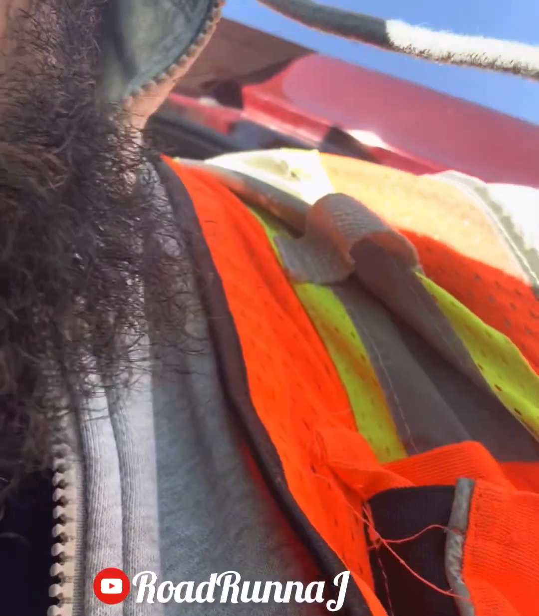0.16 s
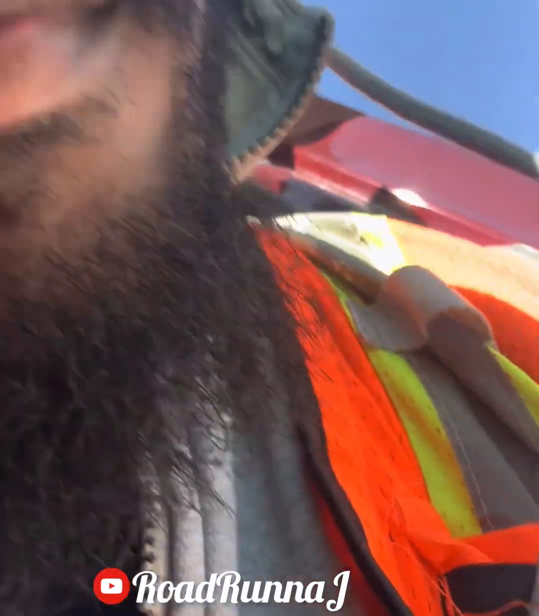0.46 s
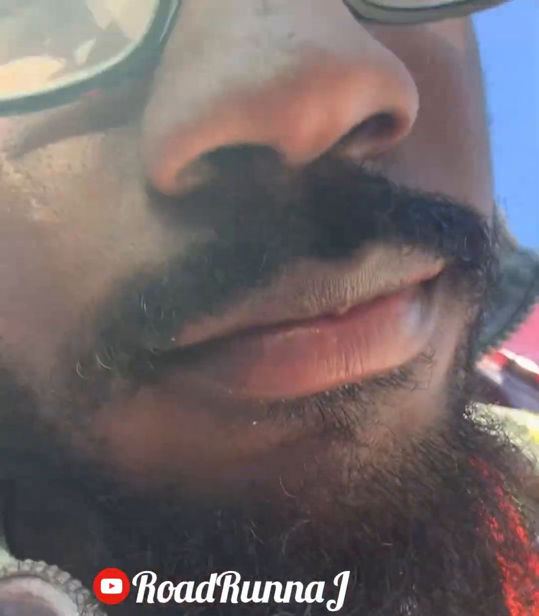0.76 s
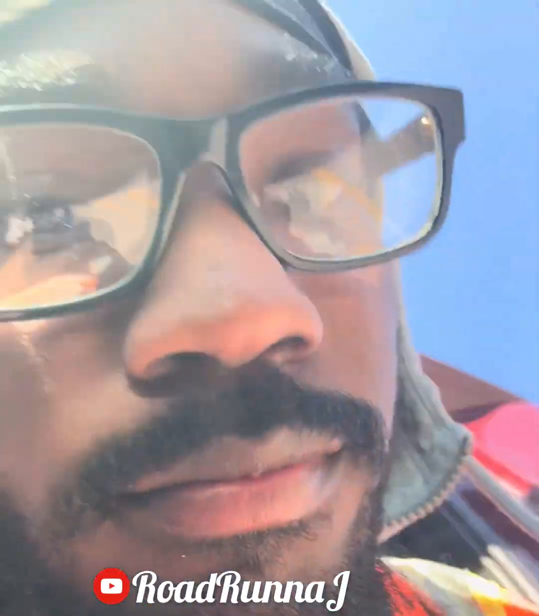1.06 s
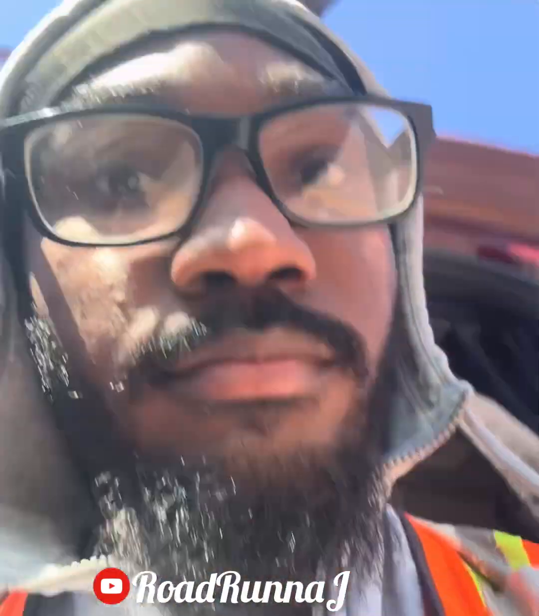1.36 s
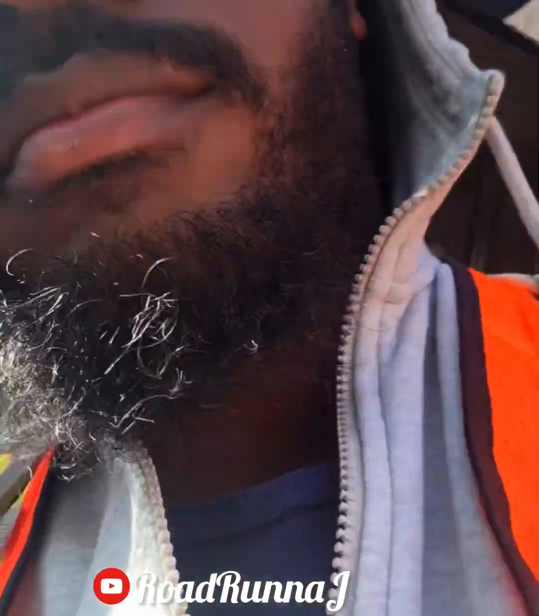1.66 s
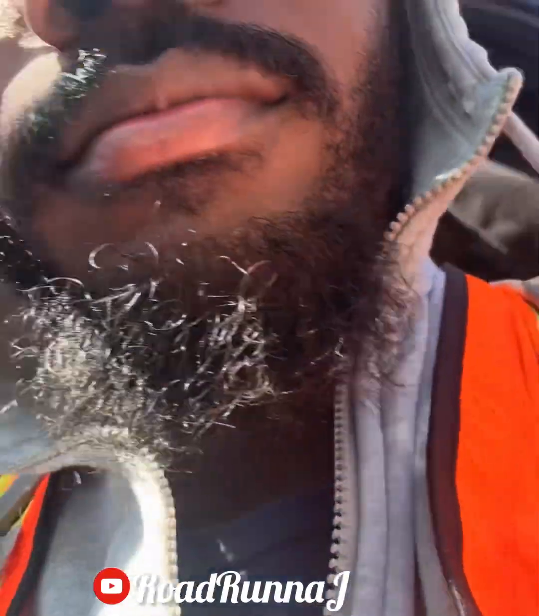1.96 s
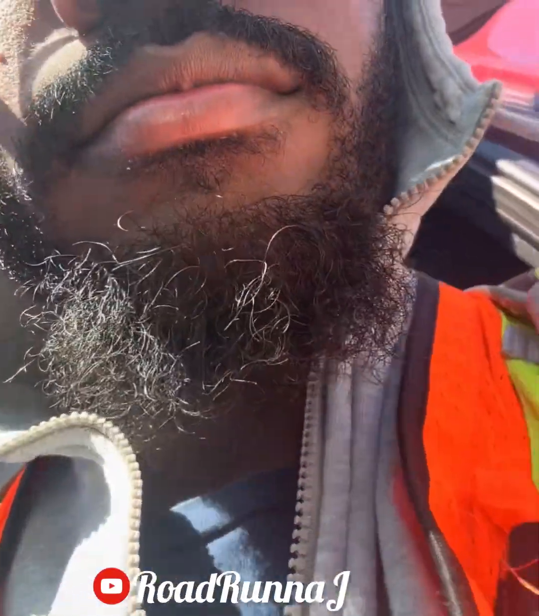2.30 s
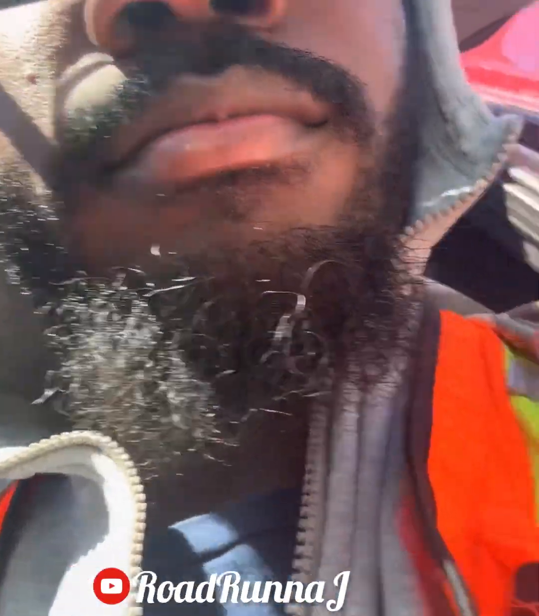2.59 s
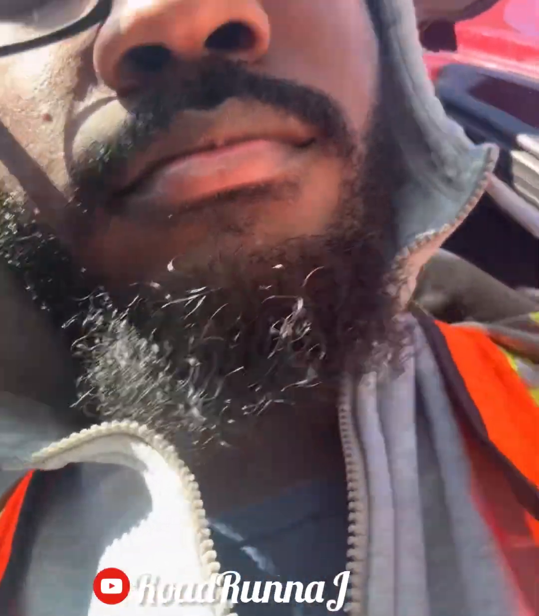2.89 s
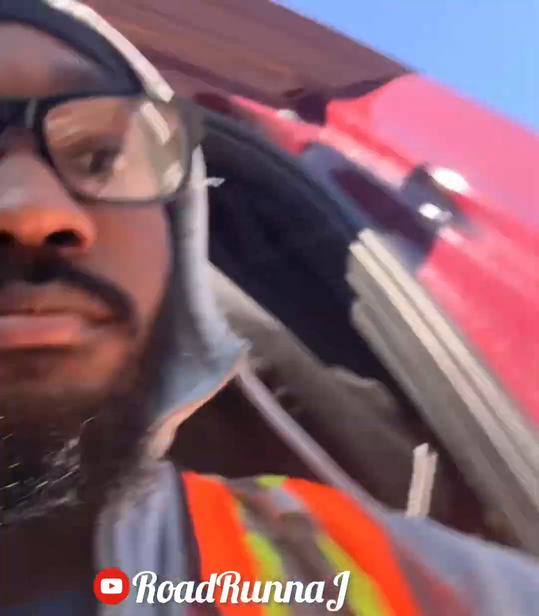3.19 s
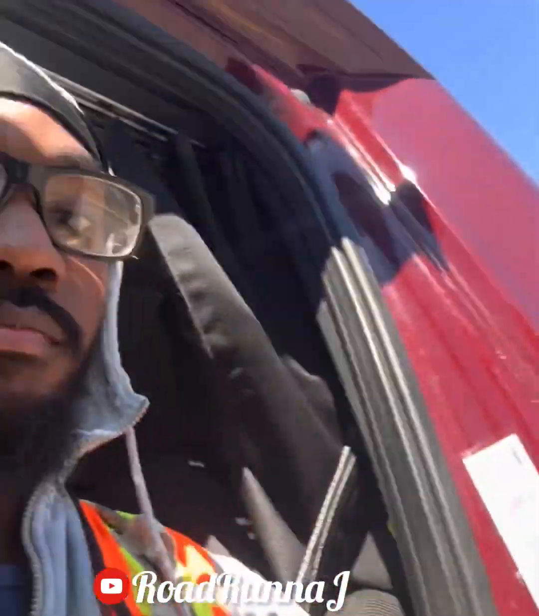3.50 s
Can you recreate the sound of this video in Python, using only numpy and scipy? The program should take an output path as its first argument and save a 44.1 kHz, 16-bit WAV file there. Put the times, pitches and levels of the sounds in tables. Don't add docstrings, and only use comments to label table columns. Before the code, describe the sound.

Steady heavy diesel idle, deep exhaust rumble and fast uneven mechanical clatter, heard beside an open truck cab outdoors. Small bumps and ticks punctuate it, as a moving handheld microphone gently changes the brightness.

```python
import sys
import numpy as np
from scipy import signal
from scipy.fft import rfft, irfft
from scipy.io import wavfile
from scipy.ndimage import uniform_filter1d

SR = 44100
rng = np.random.default_rng(int(sys.argv[2]) if len(sys.argv) > 2 else 0)


def decibels_to_gain(level_db):
    exponent = np.asarray(level_db, float) / 20
    return 10 ** exponent


def dump(signal):
    limited = np.clip(np.atleast_2d(signal).T, -1, 1)
    pcm = np.round(limited * 32767).astype(np.int16)
    wavfile.write(sys.argv[1], SR, pcm)


N = 160965

# time in seconds, four-stroke cycles per second.
CYCLE_HZ = [(0, 5.0), (2.2, 5.0), (3.0, 5.003), (3.65, 5.022)]
# time in seconds, treble shade in dB, exhaust nearness in dB.
POSE = [(0, 0, -1.5), (.3, 1.5, -2), (.62, 1.5, 0.5), (.85, 1, 0), (1.15, 1, 0), (1.3, 0.5, -1),
        (1.5, 0.5, -1.5), (1.8, -1, -1), (2.1, 0, -1), (2.35, 0.5, 0), (2.55, -0.5, -1.5), (2.8, 0, -0.5),
        (2.94, 0, -1), (3.02, 1.5, -2), (3.09, -1.5, 0), (3.2, -1, -1.5), (3.45, 0.5, -1), (3.65, 0.5, -3)]


def evened(x):
    return x / np.sqrt(np.mean(abs(x) ** 2) + 1e-20)


def read(points, hz):
    f, value = np.transpose(points)
    return np.interp(np.log(hz + 1), np.log(f + 1), value)


def bumps(rows, hz):
    return sum(db * np.exp(-((hz - f) / w) ** 2) for f, w, db in rows)


def inside(hz, points):
    return (hz >= points[0][0]) & (hz <= points[-1][0])


def moving(rows, t, hz, width):
    s, f, db = np.transpose(rows)
    detuning = hz / np.interp(t, s, f) - 1
    return np.interp(t, s, db) * np.exp(-(detuning / width) ** 2)


def spectra(x):
    hz, t, z = signal.stft(x, SR, nperseg=2048, noverlap=1536)
    return hz[:, None], t, z


def sound(z):
    return signal.istft(z, SR, nperseg=2048, noverlap=1536)[1]


def shaped(z, db):
    return decibels_to_gain(db) * evened(sound(z)[:N])


def wander(rate_hz):
    t = np.arange(0, N + 64, 64) / SR
    rates = np.geomspace(.3, rate_hz, 16)
    w = sum(np.sin(2 * np.pi * (f * t + rng.random())) / np.sqrt(f) for f in rates)
    return np.interp(np.arange(N), np.arange(len(t)) * 64, evened(w))


def cycles():
    return np.cumsum(np.interp(np.arange(N) / SR, *np.transpose(CYCLE_HZ))) / SR


def exhaust():
    # order as a multiple of the cycle rate, level in dB rms, waver from 0 to 1.
    orders = [(6, -33, .03), (9, -33, .1), (12, -22.3, .06), (15, -32, .45), (18, -26.3, .15),
              (21, -36, .3), (24, -35.5, .4), (48.9, -27, .05), (75, -40, .4), (84, -32.5, .25),
              (144, -37.5, .3), (174, -39, .4), (293.6, -41, .5), (287.6, -40, .4)]
    first_puff_s = -.0098
    turn = 2 * np.pi * (cycles() - first_puff_s * CYCLE_HZ[0][1])
    hum = 0
    for k, db, waver in orders:
        level = decibels_to_gain(db) * np.sqrt(2) * (1 + waver * wander(6.))
        bank_lag = .4 * (k - 7.1) * (k % 6 > 0)
        pipe_lag = 3.5 + .85 * (k / 6) ** 2
        hum = hum + level * np.cos(k * turn - pipe_lag - bank_lag + waver * wander(3.08))
    return hum


def rumble():
    # frequency in Hz, level in dB per Hz.
    flow = [(18, -60), (27, -22), (40, -15), (60, 22), (78, 8), (95, 18), (125, 16.5), (150, -4)]
    hz = np.fft.rfftfreq(N, 1 / SR)
    z = rfft(rng.standard_normal(N)) * decibels_to_gain(read(flow, hz)) * inside(hz, flow)
    x = irfft(z, N)
    level = np.sqrt(uniform_filter1d(x ** 2, size=SR // 3))
    return decibels_to_gain(-29) * evened(x / level)


def knocks():
    # knock strength in dB, in firing order.
    cylinder_db = [-1.1, 1, 0.46, -0.46, 0.52, -0.87]
    first_knock_s, decay_s, depth, spread_db = 0.018, 0.01, 1.16, 4
    firing = 6 * (cycles() - first_knock_s * CYCLE_HZ[0][1] + 1)
    n = firing.astype(int)
    size = decibels_to_gain(np.array(cylinder_db)[n % 6] + spread_db * rng.standard_normal(200)[n])
    age_s = firing % 1 / (6 * CYCLE_HZ[0][1])
    envelope = uniform_filter1d(1 + depth * size * np.exp(-age_s / decay_s), size=300)
    shudder = decibels_to_gain(-0.25 * wander(12))
    return envelope * shudder


def clatter(gate):
    # frequency in Hz, share that repeats every cycle.
    alike = [(120, .05), (300, .25), (600, .3), (850, .5), (1250, .32), (2000, .13), (3000, .04)]
    # frequency in Hz, share that follows the knocks.
    knocky = [(250, 0.05), (500, 0.2), (1000, 0.95), (2000, 0.45), (4500, 0.3), (10000, 0.45)]
    # frequency in Hz, variation in dB.
    ringing = [(500, 1.7), (2000, 2.2), (5000, 3), (12000, 3)]
    # frequency in Hz, share of the holder's treble shade.
    shade = [(300, 0), (800, 0.41), (1900, 1.6), (4000, 0.95), (12000, 1.6)]
    # time in seconds, frequency in Hz, lift in dB.
    doorway = [(0, 410, 5), (.22, 390, 4), (.4, 310, 5), (.62, 470, 2.5), (.85, 290, 4), (1.2, 380, 0),
               (1.5, 430, 1), (1.8, 450, 5.5), (2.1, 470, 4), (2.35, 460, 5), (2.52, 500, 3),
               (2.75, 440, 6), (3.0, 470, 2), (3.1, 720, 6), (3.35, 700, 6), (3.47, 570, 5), (3.65, 700, 4)]
    # time in seconds, frequency in Hz, lift in dB.
    chest = [(0, 950, 2), (.5, 950, 2), (.62, 2260, 1), (.8, 2140, 3), (1.05, 2220, 2), (1.4, 2040, -0.5),
             (1.6, 1370, 2), (1.9, 1160, 5), (2.15, 1220, 1.5), (2.6, 1050, 2), (2.9, 1020, -0.5),
             (3.1, 2140, 2.5), (3.5, 2070, 0), (3.65, 1880, -2)]
    same = rng.standard_normal(SR // 5)
    again = same[(cycles() % 1 * len(same)).astype(int)]
    fresh = rng.standard_normal(N)
    hz, t, steady = spectra(fresh)
    share, follow = read(alike, hz), read(knocky, hz)
    z = np.sqrt(1 - share) * (follow * spectra(gate * fresh)[2] + (1 - follow) * steady)
    z = z + np.sqrt(share) * spectra(gate * again)[2]
    power = uniform_filter1d(uniform_filter1d(abs(z) ** 2, size=15, axis=0), size=21, axis=1)
    z = z / np.sqrt(power)
    patches = uniform_filter1d(rng.standard_normal(z.shape), size=14, axis=0)
    patches = uniform_filter1d(patches, size=9, axis=1)
    rings = uniform_filter1d(rng.standard_normal(z.shape), size=12, axis=1)
    drift_db = 0.5 * evened(patches) + read(ringing, hz) * evened(rings)
    shade_db = read(shade, hz) * np.interp(t, *np.array(POSE)[:, :2].T)
    lift_db = moving(doorway, t, hz, .24) + moving(chest, t, hz, .24)
    return hz, z * decibels_to_gain(drift_db + shade_db + lift_db)


def block(hz, z):
    # frequency in Hz, level in dB per Hz.
    casting = [(100, -10), (150, -6.5), (606, -7.5), (1930, -14.5), (3280, -20.5), (4600, -28.5),
               (6800, -40.5), (7500, -63)]
    # frequency in Hz, width in Hz, gain in dB.
    panels = [(226, 7.3, 0.5), (376, 14.3, 6), (495, 9.1, -0.5), (623.4, 30, -5.5), (794, 22, 3.5),
              (938, 10, -1), (950, 33, 5.5), (1060, 33, 4.5), (1587, 11, 1.5), (1948, 140, 4),
              (2136, 28, 6), (2400, 46, -1), (2460, 36, 3.5), (3290, 180, 2)]
    # frequency in Hz, left over right in dB.
    lean_db = [(210, -.5), (320, .5), (490, 0), (740, -2.5), (1120, 2), (1700, 0), (3900, -.5)]
    level_db = -18
    z = z * decibels_to_gain(read(casting, hz) + bumps(panels, hz)) * inside(hz, casting)
    lean = np.tanh(read(lean_db, hz) * np.log(10) / 40)
    gain = decibels_to_gain(level_db) / np.std(sound(z))
    return shaped(z, level_db), gain * sound(z * lean)[:N]


def fizz(hz, z):
    # frequency in Hz, level in dB per Hz.
    jets = [(8500, 0.5), (9000, 3.5), (12600, 0.5), (13600, -1), (14400, -4)]
    sputter = decibels_to_gain(2.0 * wander(60))
    return shaped(z * decibels_to_gain(read(jets, hz)) * inside(hz, jets), -51.5) * sputter


def port_difference(gate, common):
    # frequency in Hz, level in dB per Hz.
    across = [(150, -23), (520, -3.5), (1100, -3.5), (2700, -11), (3800, -20.5), (7000, -31), (9000, -27),
              (11000, -48)]
    # frequency in Hz, width in Hz, gain in dB.
    port_nulls = [(870, 90, -4), (1750, 50, -3), (2080, 60, -4), (2290, 60, -13), (8100, 250, 4),
                  (10000, 700, 2)]
    link = .2
    hz, own = clatter(gate)
    z = np.sqrt(1 - link) * own - 1j * np.sqrt(link) * common
    side = shaped(z * decibels_to_gain(read(across, hz) + bumps(port_nulls, hz)) * inside(hz, across), -25.5)
    return side + shaped(z * ((hz > 13100) & (hz < 15500)), -58.5)


def engine():
    gate = evened(knocks())
    hz, z = clatter(gate)
    body, tilt = block(hz, z)
    return body + fizz(hz, z), tilt + port_difference(gate, z)


def handling():
    # time in seconds, peak in dB, frequency in Hz, length in seconds.
    pings = [(0.042, -16, 373, 0.058), (0.338, -23.5, 433, 0.19), (0.38, -18, 293, 0.15),
             (0.386, -22, 1917, 0.086), (0.402, -22, 1705, 0.08), (0.476, -20.5, 1960, 0.03),
             (0.488, -22, 1430, 0.04), (0.655, -27, 2000, 0.044), (0.659, -25, 2420, 0.05),
             (0.662, -25, 1490, 0.05), (0.779, -17, 2010, 0.047), (0.852, -24, 2400, 0.043),
             (1.012, -19, 1960, 0.044), (1.256, -21, 2000, 0.034), (1.454, -20, 395, 0.07),
             (1.559, -17, 414, 0.1), (1.669, -23, 1450, 0.1), (1.794, -32, 405, 0.11),
             (1.831, -20.5, 454, 0.14), (1.883, -30, 1060, 0.037), (2.008, -21.5, 369, 0.085),
             (2.045, -20, 463, 0.09), (2.052, -18, 980, 0.05), (2.056, -20, 733, 0.049),
             (2.121, -21, 1000, 0.058), (2.187, -22, 1920, 0.066), (2.409, -18, 455, 0.13),
             (2.555, -21, 402, 0.15), (2.626, -21, 990, 0.04), (2.684, -17.5, 389, 0.059),
             (2.705, -24, 2450, 0.04), (2.699, -25, 1630, 0.051), (2.729, -18, 388, 0.07),
             (2.789, -18.5, 546, 0.073), (2.87, -21, 2130, 0.044), (2.879, -25, 2510, 0.037),
             (2.924, -18, 1000, 0.035), (2.934, -17, 438, 0.086), (3.111, -16.5, 1060, 0.035),
             (3.126, -21.5, 2110, 0.059), (3.184, -22, 1974, 0.054), (3.35, -18, 714, 0.033),
             (3.471, -23, 1973, 0.071), (3.504, -25, 527, 0.063), (3.504, -21, 1076, 0.055),
             (3.555, -20, 2040, 0.034)]
    # time in seconds, peak in dB, frequency in Hz, length in seconds.
    thumps = [
        (.3, -21, 90, .2),
        (.5221, -21, 75, .2),
        (.9488, -21, 75, .2),
        (1.6093, -2, 174, .033),
        (1.652, -14, 84, .15),
        (2.679, -15, 350, .012),
        (2.7225, -12.5, 84, .12),
        (2.7395, -14, 380, .014),
    ]
    # time in seconds, peak in dB, frequency in Hz, width in Hz.
    ticks = [
        (.652, -17, 2200, 700),
        (2.651, -15, 1150, 500),
        (2.687, -22, 3200, 500),
        (2.6965, -7, 2050, 1500),
        (2.703, -16, 1900, 1200),
        (3.2835, -8, 850, 600),
    ]
    t = np.arange(N) / SR
    brief = [(s, db, hz, 4 / width) for s, db, hz, width in ticks]
    return sum(decibels_to_gain(db) * np.exp(-(4 * (t - s) / length) ** 2) * np.cos(2 * np.pi * hz * (t - s))
               for s, db, hz, length in [*pings, *thumps, *brief])


def scene():
    nearness = decibels_to_gain(np.interp(np.arange(N) / SR, *np.array(POSE)[:, [0, 2]].T))
    low = nearness * (exhaust() + rumble())
    mid, side = engine()
    mid = mid + low + handling()
    side = side + decibels_to_gain(-33.5) * low
    return np.array([mid + side, mid - side])


def roll_off(x):
    return signal.sosfilt(signal.butter(12, 15500, fs=SR, output="sos"), x)


def record(dry):
    return roll_off(np.clip(dry, -1, 1))


dry = scene()
out = record(dry)
dump(out)
```